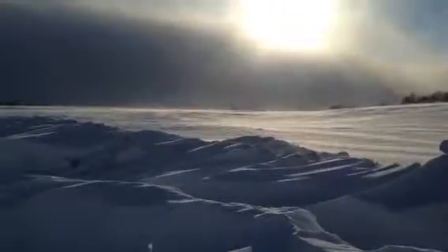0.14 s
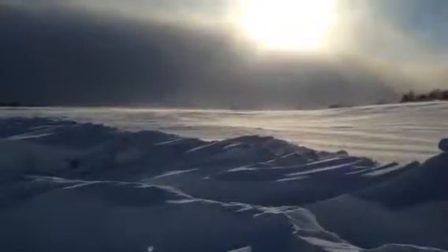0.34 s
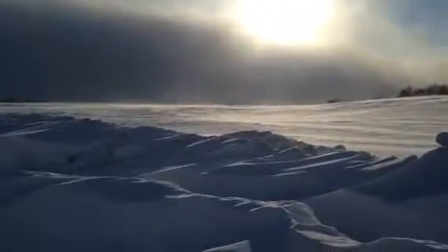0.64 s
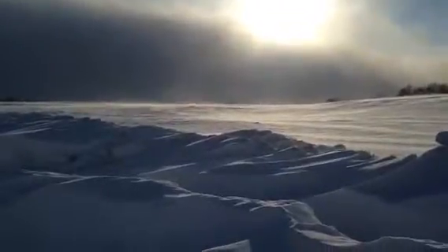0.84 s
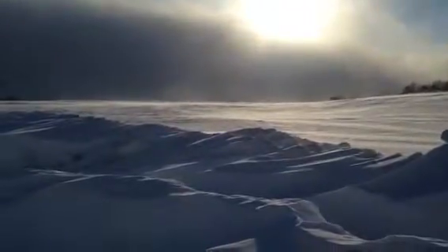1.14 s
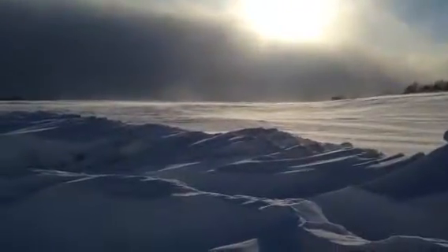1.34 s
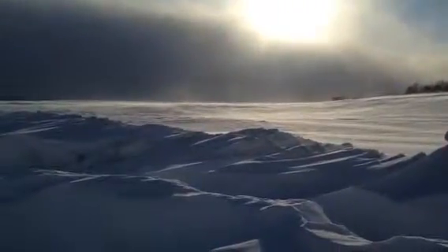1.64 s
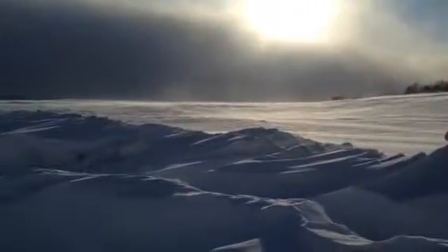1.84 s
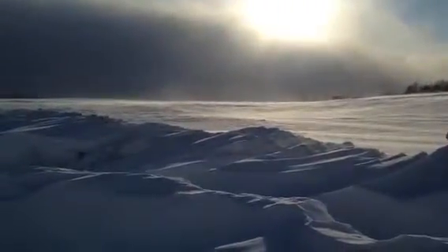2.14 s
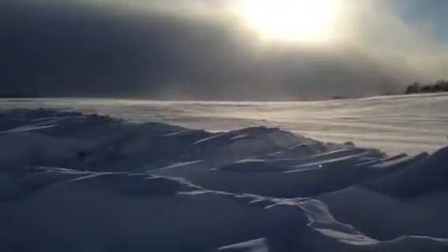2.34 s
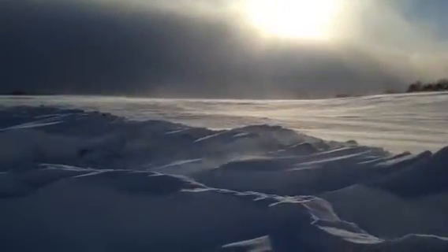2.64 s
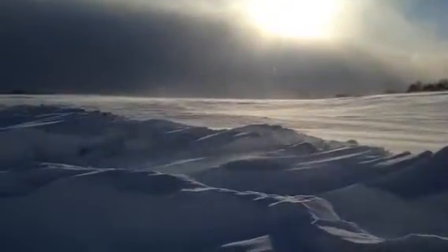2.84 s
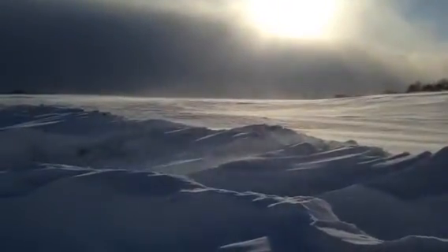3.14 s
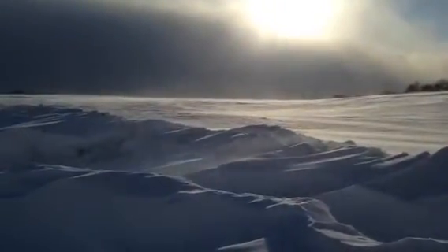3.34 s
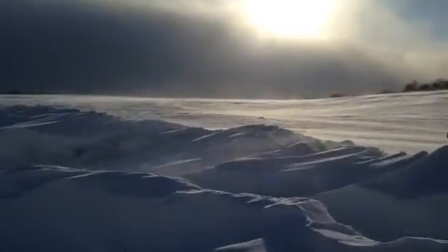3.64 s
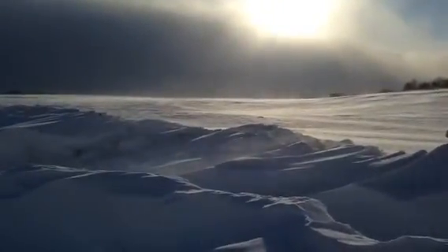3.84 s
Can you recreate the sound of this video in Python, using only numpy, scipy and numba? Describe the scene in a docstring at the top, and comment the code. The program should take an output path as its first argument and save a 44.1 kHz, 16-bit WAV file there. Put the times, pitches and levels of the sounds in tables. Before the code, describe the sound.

Wind rumbles and thumps on the microphone in a snowfield, rising to a hollow, hooting gust.

```python
"""Wind on a bare microphone in an open snowfield. Eddies rumble and thump on the housing, snow grains
tick against it, and drifting snow hisses far off. Then a strong gust arrives: the air sheds vortices
at the microphone port with a rough, hollow hoot that follows the wind speed, and its hardest blows
bump and crackle."""
import sys
import numpy as np
from scipy import signal
from scipy.fft import rfft, irfft
from scipy.io import wavfile
from scipy.ndimage import uniform_filter1d
from numba import njit

SR = 44100
rng = np.random.default_rng(int(sys.argv[2]) if len(sys.argv) > 2 else 0)


def put_to_file(sound):
    """Save the sound as 16-bit audio at rate SR, in the file named by the first command-line argument."""
    columns = np.atleast_2d(sound).T  # one column per channel
    safe = np.clip(columns, -1, 1)
    whole_steps = np.round(safe * 32767)
    wavfile.write(sys.argv[1], SR, whole_steps.astype(np.int16))


N = 176400
T = np.arange(N) / SR


def undb(db):
    """Decibels to gain."""
    return 10 ** (np.asarray(db) / 20)


def unit(x):
    """Scale to rms 1."""
    return x / np.sqrt(np.mean(x ** 2))


def curve(table, column=1):
    """One table column, interpolated linearly in time."""
    rows = np.array(table)
    return np.interp(T, rows[:, 0], rows[:, column])


def noise(spectrum, swirl=1):
    """Noise of rms 1, modulated by swirl, then shaped to the spectrum."""
    hz, db = np.array(spectrum).T
    bins_hz = np.maximum(np.fft.rfftfreq(N, 1 / SR), 1)
    gain = undb(np.interp(np.log(bins_hz), np.log(hz), db))
    return unit(irfft(rfft(swirl * rng.standard_normal(N)) * gain, N))


def flutter(rate_hz, depth_db):
    """Smooth random gain of mean power 1."""
    hold = max(int(SR / rate_hz), 2)
    steps = np.repeat(rng.standard_normal(N // hold + 1), hold)
    smooth = uniform_filter1d(uniform_filter1d(steps, hold), hold)[:N]
    return unit(undb(depth_db * unit(smooth)))


def add(out, start_s, x):
    """Mix x into out at start_s."""
    i = max(int(start_s * SR), 0)
    out[i:i + len(x)] += x[:max(N - i, 0)]


# Far wind and drifting snow. Each row: frequency in Hz, relative density in dB.
DRIFT_SPECTRUM = [(100, -6), (500, -6), (750, -2.5), (980, -1.5), (1300, -9.5), (1750, -21), (2400, -21),
                  (3300, -28.5), (4800, -35), (7000, -42), (10000, -52.5), (15000, -59)]
# Far hiss. Each row: time in seconds, level in dB.
DRIFT_LEVELS = [(0, -46), (.4, -47.5), (1.2, -46.5), (1.7, -48.5), (2.25, -52.5), (2.6, -48.5), (3.1, -54),
                (4, -56)]
# Powder snow. Each row: frequency in Hz, relative density in dB.
POWDER_SPECTRUM = [(1000, -16.5), (4000, 4.5), (7000, -4), (10000, -5.5), (13000, -3.5), (15000, 1.5),
                   (17000, -21.5)]
# Powder sizzle. Each row: time in seconds, level in dB.
POWDER_LEVELS = [(0, -70.5), (.5, -78), (1.7, -76), (2.2, -70.5), (2.4, -74.5), (2.57, -69.5), (2.7, -78.5),
                 (4, -75)]

def drifting_snow():
    """Wind hisses across the field; powder snow sizzles faintly as it blows past."""
    breeze = flutter(rate_hz=14, depth_db=0.3)
    hiss = noise(DRIFT_SPECTRUM, breeze) * undb(curve(DRIFT_LEVELS))
    sizzle = noise(POWDER_SPECTRUM) * undb(curve(POWDER_LEVELS))
    return hiss + sizzle


# Rumble in light wind. Each row: frequency in Hz, relative density in dB.
LIGHT_WIND_SPECTRUM = [(20, -30), (35, -18.5), (55, -6.5), (85, -2), (190, -9.5), (320, -16.5),
                       (500, -26.5), (1000, -50.5), (3000, -81), (10000, -115)]
# Rumble in the gust. Each row: frequency in Hz, relative density in dB.
STRONG_WIND_SPECTRUM = [(20, -31), (40, -20), (70, 0), (180, 1.5), (350, 0.5), (600, -5), (1000, -40.5),
                        (2000, -46), (5000, -64.5), (10000, -105)]
# Flow round the housing. Each row: time in seconds, level in dB.
RUMBLE_LEVELS = [(0, -33.5), (.6, -30), (.8, -36), (1.25, -33), (1.6, -26.5), (2.1, -31.5), (2.32, -31.5),
                 (2.56, -27.5), (2.7, -16.5), (2.82, -26), (3.0, -20.5), (3.15, -25.5), (3.5, -25.5),
                 (3.66, -26.5), (3.76, -26), (4, -22.5)]

def rumble(gusting):
    """Small eddies tumble round the housing, quicker and brighter in the gust."""
    light = noise(LIGHT_WIND_SPECTRUM, flutter(rate_hz=70, depth_db=2))
    strong = noise(STRONG_WIND_SPECTRUM, flutter(rate_hz=130, depth_db=3.2))
    return undb(curve(RUMBLE_LEVELS)) * (light * (1 - gusting) + strong * gusting)


# Eddy hits. Each row: start in seconds, length in seconds, level in dB, upper edge in Hz.
EDDY_HITS = [(0.095, 0.011, -15, 318), (0.121, 0.045, -23.5, 406), (0.301, 0.02, -20.5, 190),
             (.487, 0.017, -22, 400), (0.535, 0.021, -21, 390), (0.643, 0.044, -19, 344),
             (0.885, 0.015, -28.5, 330), (0.998, 0.017, -28, 220), (1.348, 0.029, -16.5, 184),
             (1.445, 0.032, -21.5, 210), (1.552, 0.036, -28.5, 412), (1.607, .022, -26, 480),
             (1.63, 0.015, -33.5, 400), (1.702, 0.015, -20.5, 420), (1.734, 0.033, -18.5, 100),
             (1.765, 0.02, -20, 370), (1.799, 0.017, -16.5, 259), (1.819, 0.049, -23.5, 476),
             (1.881, 0.016, -24, 387), (1.99, 0.0089, -16.5, 556), (2.026, 0.043, -26.5, 640),
             (2.075, 0.038, -20, 416), (2.122, 0.053, -21, 330), (2.239, 0.037, -26.5, 200),
             (2.381, 0.013, -17.5, 330), (2.429, 0.019, -22, 486), (2.469, 0.029, -24.5, 430),
             (2.533, 0.018, -29.5, 400), (2.588, 0.0063, -18, 328), (2.623, 0.024, -20, 680),
             (2.653, 0.025, -13.5, 614), (2.707, 0.026, -16, 600), (3.022, 0.034, -12, 429),
             (3.042, 0.049, -23, 1180), (3.068, 0.021, -10.5, 456), (3.112, 0.01, -18.5, 374),
             (3.141, 0.0089, -21.5, 520), (3.207, 0.022, -17.5, 497), (3.244, 0.0077, -23.5, 620),
             (3.33, 0.0074, -25, 600), (3.372, .008, -22.5, 560), (3.441, 0.0076, -17, 477.4),
             (3.476, .008, -22, 544.4), (3.529, 0.005, -18, 420), (3.555, 0.039, -16.5, 500),
             (3.706, 0.0077, -22, 650), (3.756, 0.036, -17.5, 600)]

def buffets(low_hz=59.3, tilt=0.28, rolloff_order=3.69, edge_s=0.003, size=16384):
    """Each eddy hits the microphone as an uneven low pressure burst; faster eddies reach higher."""
    out = np.zeros(N)
    t = (np.arange(size) - size // 64) / SR
    pad = size // 8  # room for the filter's pre-ringing
    hz = np.maximum(np.fft.rfftfreq(size, 1 / SR), 1)
    low_cut = 1 / np.hypot(1, (low_hz / hz) ** 5)
    swirl = flutter(rate_hz=130, depth_db=3)
    for start_s, length_s, db, edge_hz in EDDY_HITS:
        high_cut = 1 / np.hypot(1, (hz / edge_hz) ** rolloff_order)
        envelope = (1 + np.tanh(t / edge_s)) * (1 - np.tanh((t - length_s) / edge_s))
        push = rng.standard_normal(size) * envelope * np.roll(swirl, -int(start_s * SR))[:size]
        burst = irfft(rfft(np.roll(push, pad)) * hz ** -tilt * low_cut * high_cut)
        rms = np.sqrt(np.sum(burst ** 2) / (length_s * SR))
        add(out, start_s + t[0] - pad / SR, undb(db) * burst / rms)
    return out


def snaps(table, low_hz, decay_s, size=1024):
    """Short band-passed snaps, each a sharp front and a dying scratch."""
    out = np.zeros(N)
    t = np.arange(size) / SR
    front = t == 0
    for start_s, peak_db, edge_hz in table:
        scratch = 0.086 * rng.standard_normal(size) * np.exp(-t / decay_s)
        band = signal.butter(4, [low_hz, edge_hz], "band", fs=SR, output="sos")
        snap = signal.sosfilt(band, front - scratch)
        add(out, start_s, undb(peak_db) * snap / np.abs(snap).max())
    return out


# Grain impacts. Each row: start in seconds, peak in dB, upper edge in Hz.
GRAIN_HITS = [(.2513, -44, 15000), (.2718, -47, 12000), (.82, -55, 12000), (1.5304, -52, 13000),
              (2.274, -44, 9000), (2.2965, -46, 15000), (3.0523, -12.5, 15300), (3.0808, -44, 14900)]

def snow_ticks():
    """Grains of snow and ice strike the housing."""
    return snaps(GRAIN_HITS, low_hz=2300, decay_s=0.0012)


# Hardest blows. Each row: start in seconds, peak in dB, upper edge in Hz.
HARD_BLOWS = [(1.992, -30, 1230), (2.864, -29, 1680), (2.904, -23, 1560), (2.927, -30.5, 1900),
              (3.0425, -16.5, 1895), (3.047, -13, 2020), (3.078, -11, 1600), (3.0808, -14.5, 2300),
              (3.088, -19, 1660), (3.0925, -25, 1750), (3.6165, -26, 1880), (3.7065, -26, 1977),
              (3.7755, -16, 1622)]

def wind_cracks():
    """The hardest blows of air crack on the microphone."""
    return snaps(HARD_BLOWS, low_hz=650, decay_s=0.0002)


@njit
def resonate(x, centre_hz, width_hz):
    """State-variable band-pass with a moving centre."""
    y = np.empty(len(x))
    band_state, low_state = 0., 0.
    for i in range(len(x)):
        gain = np.tan(np.pi * centre_hz[i] / SR)
        damping = width_hz / centre_hz[i]
        band = (band_state + gain * (x[i] - low_state)) / (1 + gain * (gain + damping))
        band_state = 2 * band - band_state
        low_state += 2 * gain * band
        y[i] = damping * band
    return y


def vortices(centre_hz, width_hz=221.0, top_hz=1420, steady_s=0.076):
    """Turbulence in a steep resonance; the flow holds its strength steady over steady_s."""
    air = signal.sosfilt(signal.butter(2, top_hz, fs=SR, output="sos"), rng.standard_normal(N))
    band = resonate(resonate(air, centre_hz, width_hz), centre_hz, width_hz)
    power = uniform_filter1d(band ** 2, int(steady_s * SR))
    return band / np.sqrt(power + 1e-12)


# Gust at the port. Each row: time in seconds, hoot pitch in Hz, roar centre in Hz, drive in dB.
PORT_FLOW = [(2.62, 506.2, 620, -14), (2.665, 520.2, 640, -17), (2.72, 504.4, 640, -16),
             (2.77, 514.8, 620, -16), (2.795, 513.5, 600, -24), (2.835, 525.3, 600, -23),
             (2.86, 527.3, 690, -16.5), (2.905, 531.3, 713, -17), (2.935, 511.2, 600, -22.5),
             (2.955, 503.5, 620, -14.5), (3.02, 494.7, 620, -13), (3.11, 490, 580, -23),
             (3.265, 480, 550, -21.5), (3.31, 467.9, 560, -23.5), (3.355, 458.6, 540, -23.5),
             (3.38, 446.3, 520, -23), (3.425, 422, 520, -25.5), (3.485, 465.7, 540, -18.5),
             (3.515, 429.6, 520, -35), (3.56, 456, 560, -16.5), (3.6, 524.3, 640, -18.5),
             (3.635, 540, 740, -18), (3.662, 564.7, 680, -18.5), (3.685, 568.7, 730, -24.5),
             (3.73, 552, 740, -20), (3.765, 530, 680, -15), (3.82, 494.5, 560, -21), (3.915, 460, 553, -23),
             (4, 500, 580, -24.5)]
# Fine turbulence. Each row: frequency in Hz, relative density in dB.
RASP_SPECTRUM = [(400, -13), (750, 1), (1000, -2), (1200, -3.5), (1420, -7.5), (1900, -16.5), (2800, -31.5),
                 (4500, -40.5), (7000, -63), (15000, -95.5)]

def gust(gusting, hoot_db=-3.5, roar_db=-7.5, rasp_db=-17, rasp_exponent=1.51):
    """Vortices at the port hoot and roar; a rasp of fine turbulence grows faster than either."""
    drive = undb(curve(PORT_FLOW, column=3))
    shake = flutter(rate_hz=110, depth_db=1.9)
    hoot_hz = curve(PORT_FLOW, column=1) * flutter(rate_hz=230, depth_db=0.56)
    roar_hz = curve(PORT_FLOW, column=2)
    tone = np.sqrt(2) * np.sin(2 * np.pi * np.cumsum(hoot_hz) / SR)
    hoot = undb(hoot_db) * tone * flutter(rate_hz=120, depth_db=3.5)
    roar = undb(roar_db) * vortices(roar_hz) * flutter(rate_hz=140, depth_db=3.5)
    rasp = undb(rasp_db) * noise(RASP_SPECTRUM, flutter(rate_hz=220, depth_db=4))
    return gusting * shake * (drive * (hoot + roar) + drive ** rasp_exponent * rasp)


def scene(gust_start_s=2.603, gust_rise_s=0.015):
    """Wind on the microphone over the far hiss, in mono."""
    gusting = np.clip((T - gust_start_s) / gust_rise_s, 0, 1)
    crackle = wind_cracks() + snow_ticks()
    return (drifting_snow() + rumble(gusting) + buffets() + gust(gusting) + crackle)[None]


def record(dry):
    """Quick fade-in, soft peak limiting, steep low-pass."""
    fade_s, ceiling, top_hz = 0.004, 0.83, 15400
    fade = np.minimum(T / fade_s, 1)
    limited = dry / (1 + (dry / ceiling) ** 8) ** (1 / 8)
    low_pass = signal.ellip(10, 0.2, 80, top_hz, fs=SR, output="sos")
    return signal.sosfilt(low_pass, fade * limited)


dry = scene()
out = record(dry)
put_to_file(out)
```